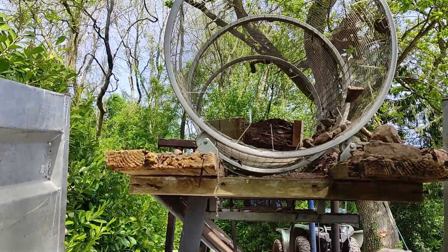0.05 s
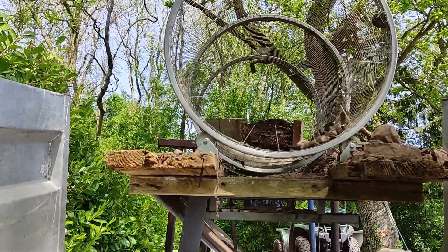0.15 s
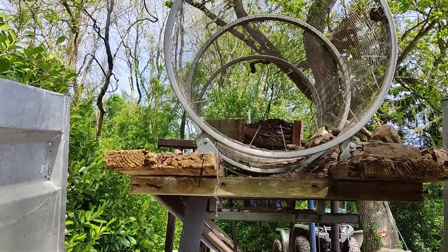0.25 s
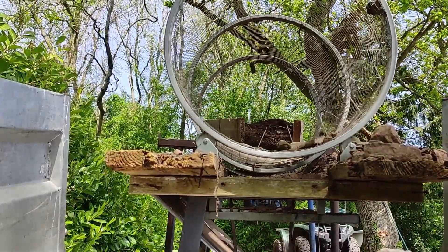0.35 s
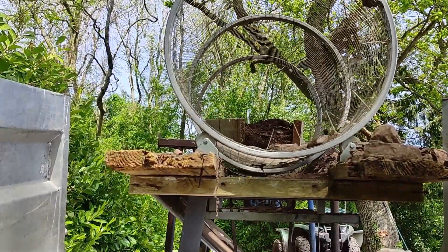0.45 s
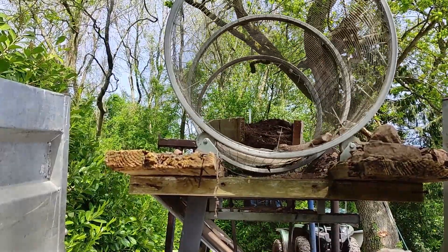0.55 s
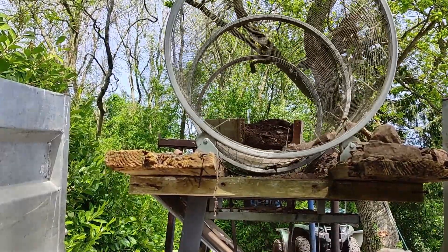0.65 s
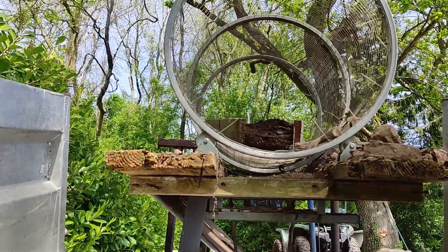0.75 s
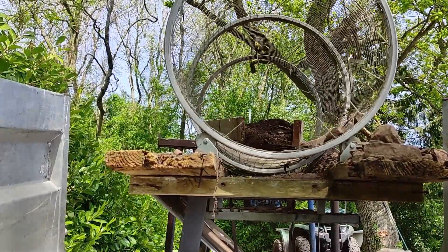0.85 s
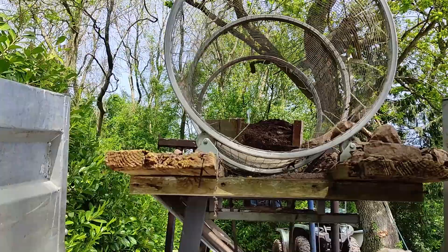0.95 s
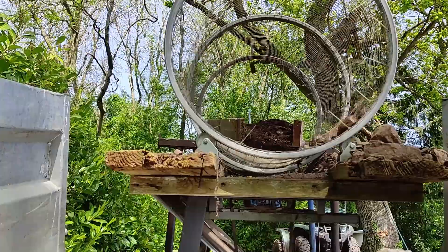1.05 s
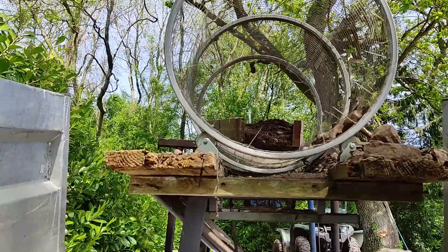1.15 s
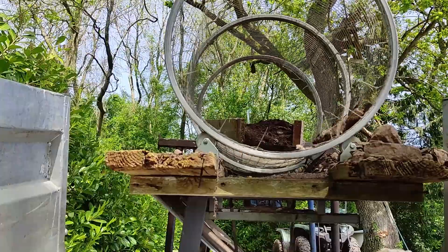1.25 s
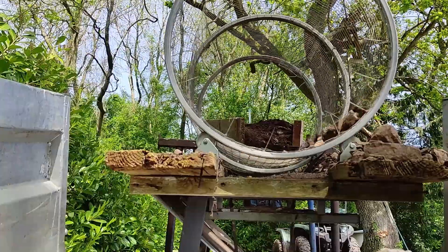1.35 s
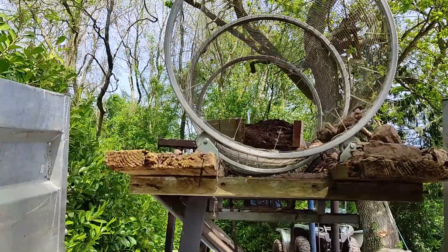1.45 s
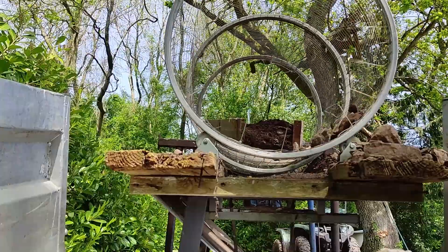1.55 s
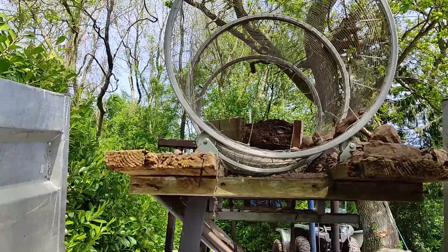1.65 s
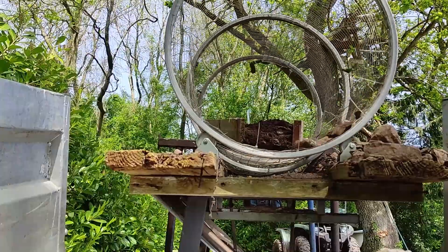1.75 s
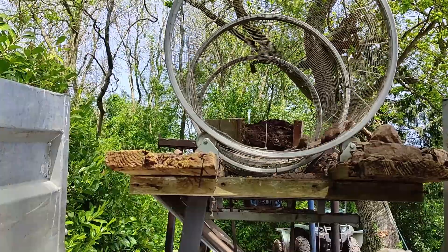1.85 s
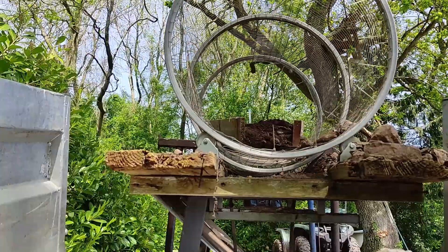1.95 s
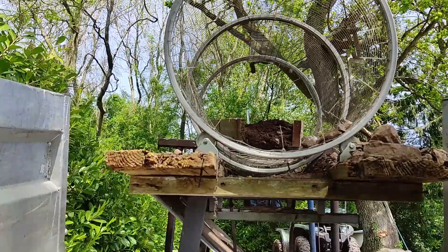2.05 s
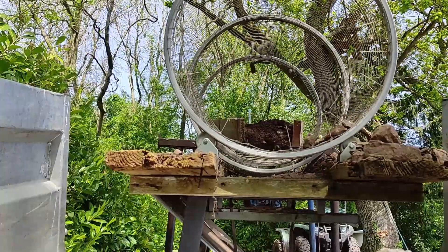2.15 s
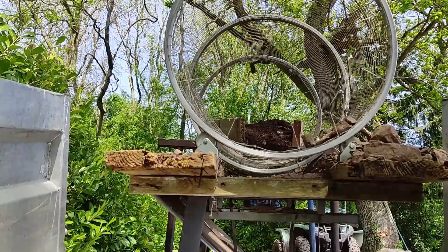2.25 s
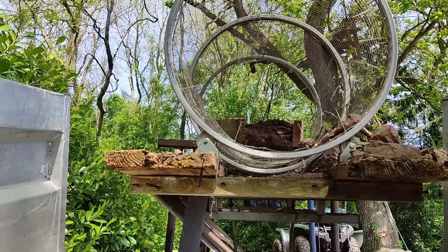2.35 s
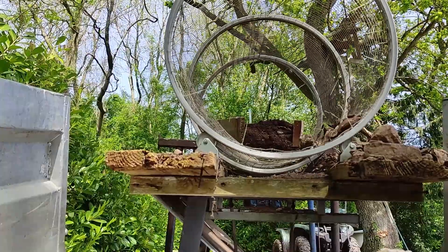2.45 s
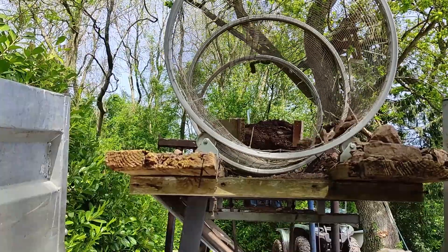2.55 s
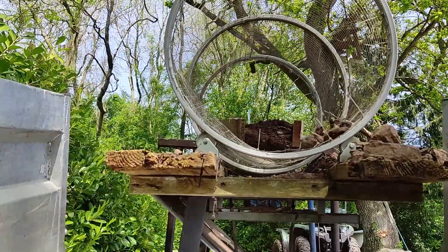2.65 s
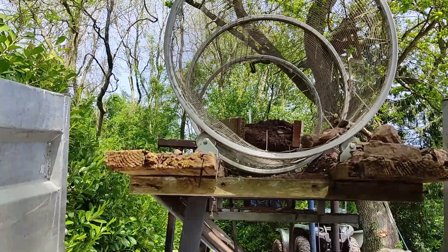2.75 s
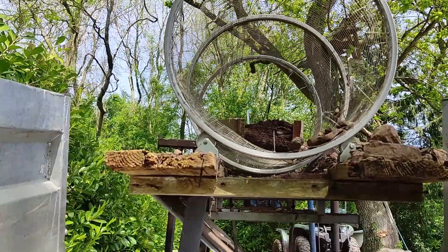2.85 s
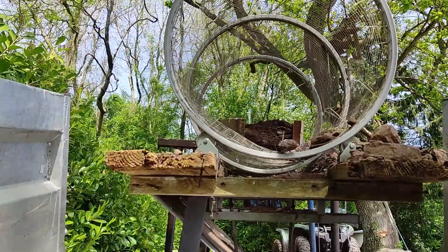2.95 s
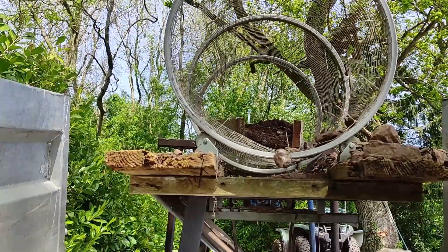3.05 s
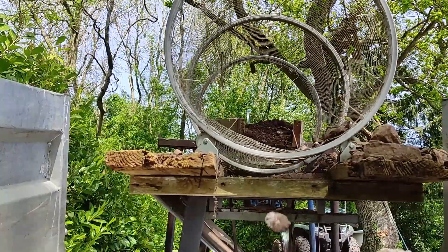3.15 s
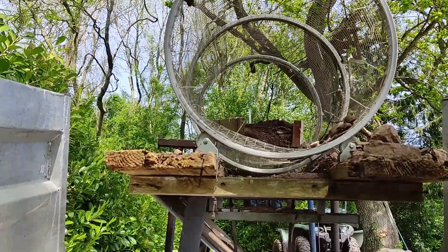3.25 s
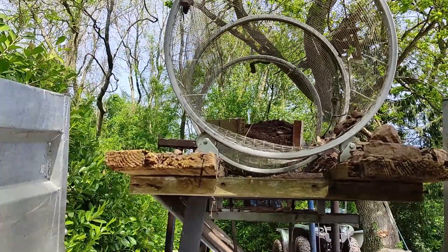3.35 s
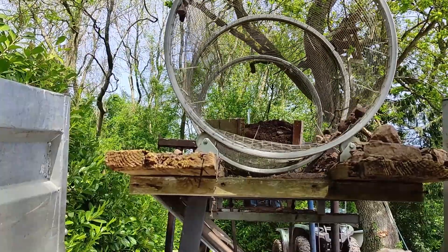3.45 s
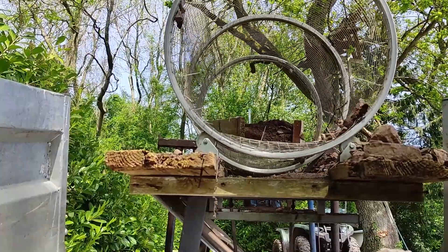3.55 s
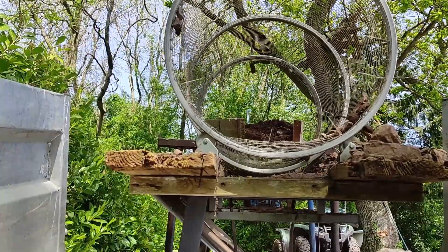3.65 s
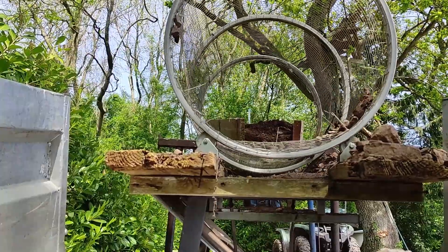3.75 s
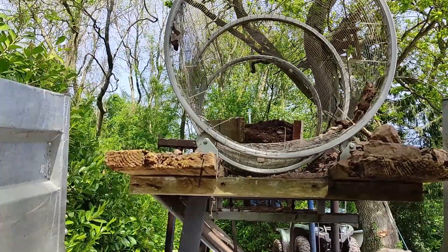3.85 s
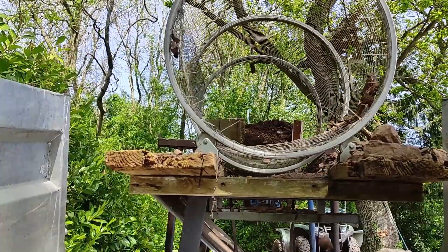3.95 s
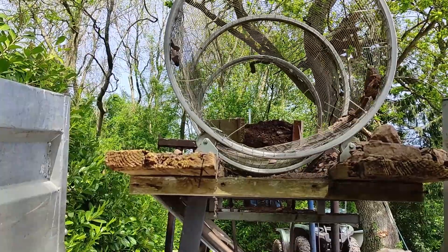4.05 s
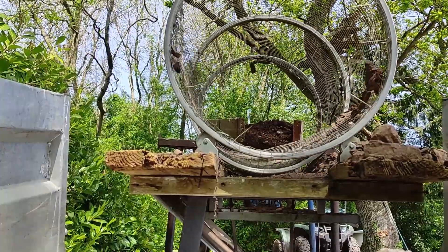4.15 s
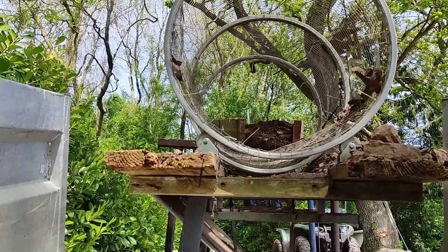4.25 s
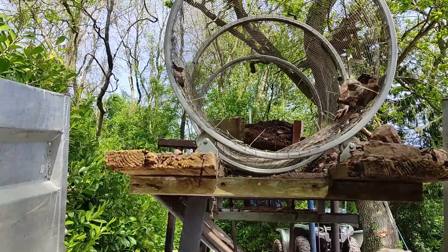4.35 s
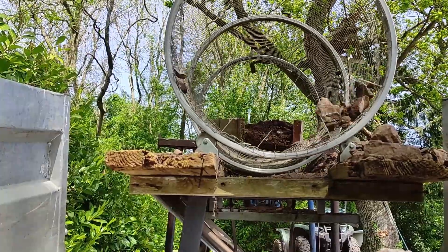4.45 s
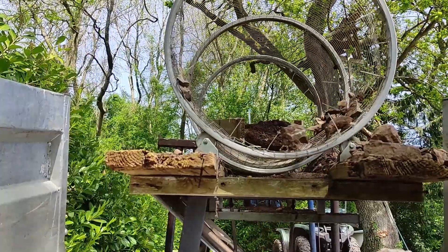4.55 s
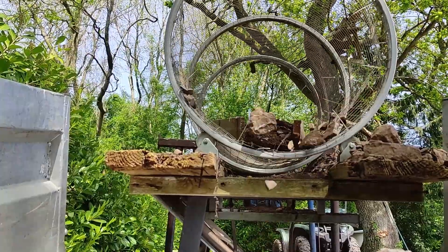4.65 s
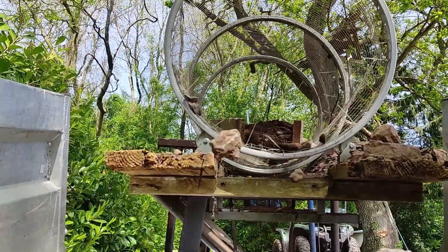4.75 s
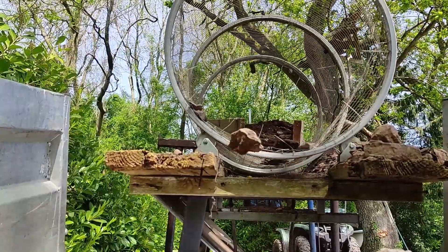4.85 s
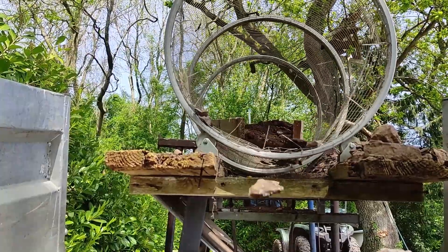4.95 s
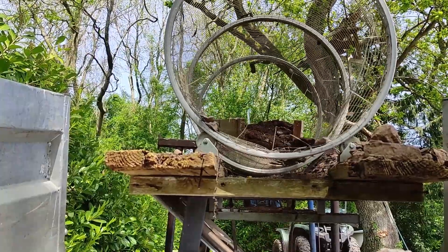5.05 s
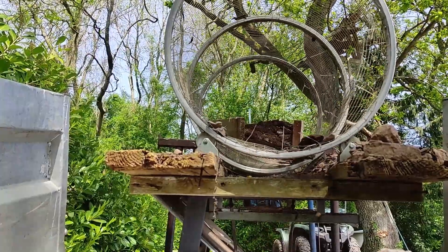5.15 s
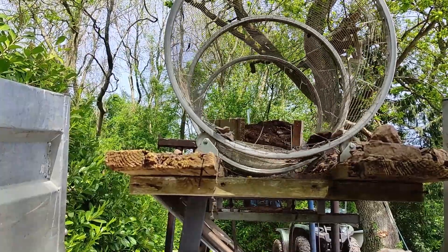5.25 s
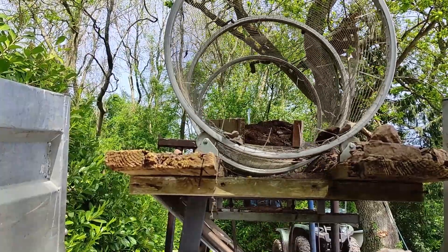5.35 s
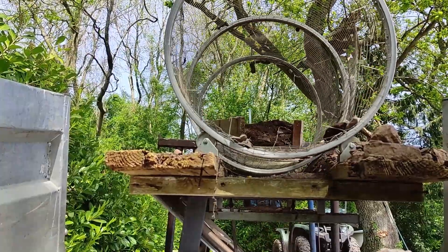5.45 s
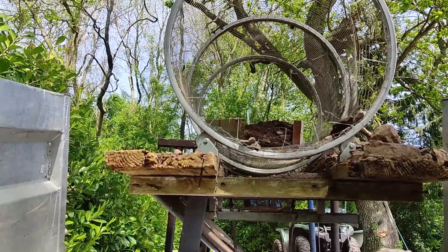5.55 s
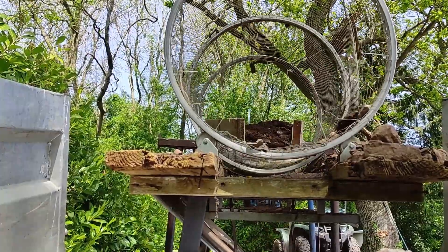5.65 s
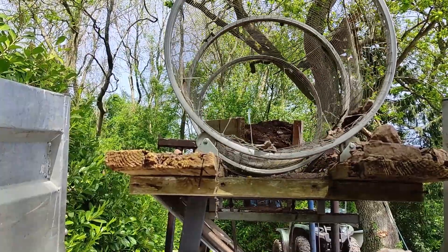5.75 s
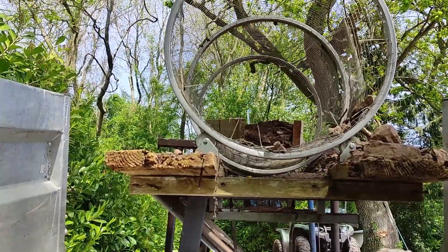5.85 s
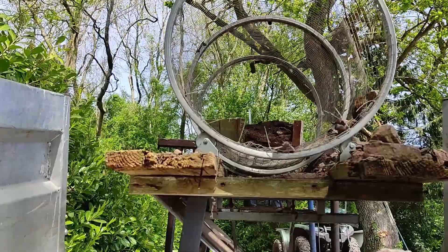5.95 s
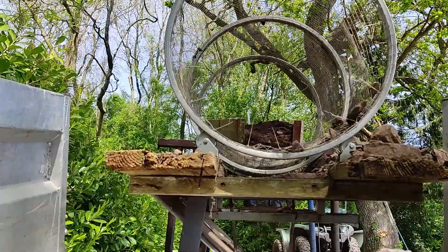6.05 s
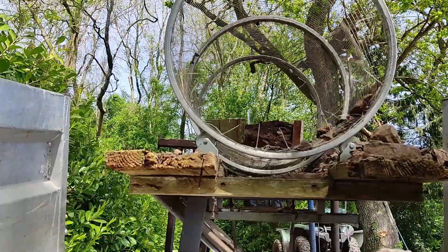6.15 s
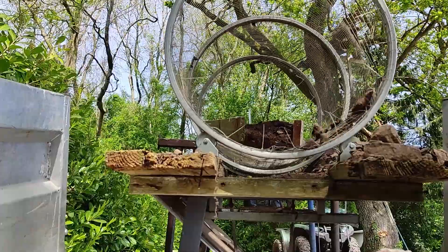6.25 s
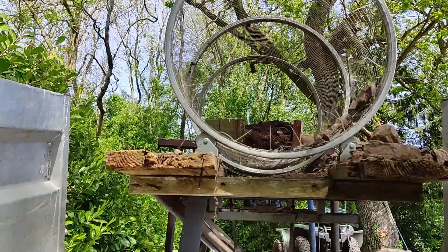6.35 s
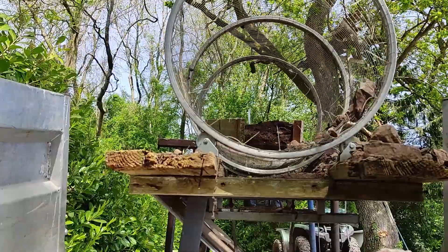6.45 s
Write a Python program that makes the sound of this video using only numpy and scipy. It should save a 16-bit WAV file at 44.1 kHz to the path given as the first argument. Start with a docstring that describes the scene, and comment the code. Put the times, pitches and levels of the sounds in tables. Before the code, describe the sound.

Dry rattling of soil and small stones on wire mesh, a periodic squeak, low rumble, and two heavy metallic bangs.

```python
"""Booms and knocks stand out over rattling wire, a hiss of soil, short squeaks and a low rumble.
Stones and clods tumble in a slowly turning wire-mesh drum outdoors and drop onto a frame and a sheet-metal bed.
Drops and clods excite decaying modes of metal and mesh through bursts of small contacts; squeaks are
stick-slip tones, the loud ones from a roller once a turn; rumble, rolling, chatter and soil are shaped noise."""
import sys
import numpy as np
from scipy import signal
from scipy.fft import rfft, irfft
from scipy.io import wavfile
from scipy.ndimage import uniform_filter1d

SR = 44100
rng = np.random.default_rng(int(sys.argv[2]) if len(sys.argv) > 2 else 0)


def wav_out(sig):
    """Save sig, one row per channel (or a flat mono array), as 16-bit PCM at SR to the path in sys.argv[1]."""
    wavfile.write(sys.argv[1], SR, np.round(np.clip(np.atleast_2d(sig).T, -1, 1) * 32767).astype(np.int16))


N = 286650
HIT_T = np.arange(int(0.3 * SR)) / SR  # time axis of one hit, s


def undb(db):
    """Logarithmic level: decibels to an amplitude ratio."""
    return 10 ** (np.asarray(db) / 20)


def unit(x):
    """Normalization: scale to a standard deviation of 1."""
    return x / x.std()


def band(x, low_hz, high_hz):
    """Band-pass filtering: gentle slopes on both sides."""
    return signal.sosfilt(signal.butter(2, [low_hz, high_hz], "band", fs=SR, output="sos"), x)


def colour(x, spectrum):
    """Spectral shaping: weight each frequency by (Hz, dB) points, then scale to rms 1."""
    hz, db = np.transpose(spectrum)
    grid = np.maximum(np.arange(len(x) // 2 + 1) * SR / len(x), 1)
    gain_db = np.interp(np.log(grid), np.log(hz), db, -120, -120)
    y = irfft(rfft(x) * undb(gain_db), len(x))
    return y / np.sqrt(np.mean(y ** 2))


def walk(rate):
    """Slow random modulation: random levels held 1 / rate s and smoothed twice."""
    hold = int(SR / rate)
    steps = np.repeat(rng.standard_normal(N // hold + 1), hold)
    return 1.02 * uniform_filter1d(uniform_filter1d(steps, hold), hold)[:N]


def slips(rate, tail_s, spread_db, depth):
    """Random pulse process: slides of the load make a gain rise at random moments and sink back; rms 1."""
    starts = (rng.random(N) < rate / SR) * undb(spread_db * rng.exponential(size=N))
    slides = signal.lfilter([1], [1, -np.exp(-1 / (tail_s * SR))], starts)
    gain = 1 + depth * uniform_filter1d(slides, size=150)
    return gain / np.sqrt(np.mean(gain ** 2))


def ring(modes, near_hz, favour_db, octaves, scatter_db):
    """Modal superposition: one tap starts decaying sines; where it lands favours those near one pitch."""
    hz, db, t60 = (c[:, None] for c in np.transpose(modes))
    level_chance, pitch_chance = rng.standard_normal((2, len(modes), 1))
    favour = np.exp(-(np.log2(hz / near_hz) / octaves) ** 2)
    db = db + favour_db * favour + scatter_db * level_chance
    sines = np.sin(2 * np.pi * hz * (1 + 0.014 * pitch_chance) * HIT_T)
    return np.sum(undb(db - 60 * HIT_T / t60) * sines, axis=0)


def strike(taps, modes):
    """Linear response: every tap of a contact burst starts the same ringing."""
    return signal.fftconvolve(taps, modes)[:len(taps)]


def crumble(length_s, rise_s, tail_s, grit_db):
    """Contact noise: many small contacts as noise that rises, holds and dies, uneven if grit_db > 0."""
    shape = np.minimum(HIT_T / rise_s, 1) * np.exp(-np.maximum(HIT_T - length_s, 0) / tail_s)
    return shape * rng.standard_normal(len(HIT_T)) * undb(grit_db * rng.exponential(size=len(HIT_T)))


def add(out, sound, s, peak_db):
    """Superposition: mix a sound in at a time and a peak level (taken over about 9 ms)."""
    peak = np.sqrt(2 * uniform_filter1d(sound ** 2, size=400).max())
    i = max(int(s * SR), 0)
    out[i:i + len(sound)] += (sound * undb(peak_db) / peak)[:N - i]


def grains():
    """Granular noise: samples of very uneven strength."""
    return rng.standard_normal(N) * undb(1.44 * rng.exponential(size=N))


# Low spectrum of the frame. Each row: frequency in Hz, relative density in dB.
RUMBLE_SPECTRUM = [(15, -43), (25, -17), (43, 8), (69, -1.5), (103, 10.5), (209, -13), (248, -9),
                   (280, -38), (360, -67.5), (620, -120)]


def frame_rumble(rumble_db):
    """Forced vibration: low noise whose level wanders slowly around the load's level."""
    return colour(grains(), RUMBLE_SPECTRUM) * undb(rumble_db + 1.2 * walk(5.3))


# Spectrum of rolling clods. Each row: frequency in Hz, relative density in dB.
ROLLING_SPECTRUM = [(140, -30.5), (230, -0.5), (287, -6.5), (412, -4.5), (602, -8), (679, -7), (802, -8),
                    (2100, -21.5), (2730, -47), (4620, -120)]
# Modes of the sheet-metal bed and frame. Each row: nominal frequency in Hz, relative level in dB,
# 60 dB decay time in s.
BED_MODES = [(55, -17, .2), (95, 16, 0.16), (114.2, 16.5, 0.15), (151.8, 6.5, 0.23), (158, 2, 0.13),
             (208.6, -20.5, 0.11), (246.4, -10, 0.25), (326, -28.5, 0.25), (413, -8.5, 0.16),
             (405, -20, 0.026), (496, -10.5, 0.13), (559, -12.5, 0.25), (673, -15.5, 0.26),
             (695, -26.5, 0.26), (887, -22.5, 0.14), (980, -18.5, 0.13), (1003, -13.5, 0.22),
             (1213, -2.5, 0.027), (1345, -17, 0.081), (1589, -21, 0.12)]


def rolling_clods(rolling_db):
    """Random excitation: uneven rolling noise, and the hum of the frame that it keeps ringing."""
    frame = ring([m for m in BED_MODES if m[0] > 200], 420, 0, 1, 0)
    push = rng.standard_normal(N) * slips(16, 0.047, 3.46, 3.5)
    hum = unit(signal.fftconvolve(push, frame)[:N])
    rolling = colour(grains() * slips(46, 0.019, 0.64, 0.88), ROLLING_SPECTRUM)
    return (rolling + undb(-9.0) * hum) * undb(rolling_db)


# Spectrum of chattering wires. Each row: frequency in Hz, relative density in dB.
CHATTER_SPECTRUM = [(1120, -32.5), (1900, -55), (2290, 10.5), (2500, 6.5), (3250, 12), (3630, 8), (4040, 4),
                    (4600, -14), (5980, -51), (10100, -120)]


def mesh_chatter(chatter_db, slide):
    """Amplitude modulation: slides of the load shake noise coloured like the wires."""
    return colour(grains() * slide * slips(30, 0.0049, 1.7, 1.0), CHATTER_SPECTRUM) * undb(chatter_db)


# Spectrum of falling soil. Each row: frequency in Hz, relative density in dB.
SOIL_SPECTRUM = [(2470, -21), (4200, -2.5), (4920, -2), (5930, -2.5), (6330, -2), (7310, 1), (7820, -8.5),
                 (8460, -53.5), (11000, -73), (18600, -120)]


def sifting_soil(soil_db, chatter_db, slide):
    """Granular flow: coarse crumbs sound lower and go with the chatter; fine sand hisses on top."""
    crumbs = band(colour(grains() * slide * slips(56, 0.01, 3.6, 1.1), SOIL_SPECTRUM), 2400, 4920)
    sand = band(colour(grains() * slide * slips(40, 0.0092, 3.0, 0.69), SOIL_SPECTRUM), 5370, 11000)
    return crumbs * undb((soil_db + chatter_db) / 2 - 2.5) + sand * undb(soil_db)


# Load in the drum. Each row: time in seconds, then the nominal levels in dB of rumble, rolling,
# mesh chatter and sifting soil.
LOAD_LEVELS = [(0, -57.5, -54.5, -55.5, -58.5), (0.15, -51.5, -63, -66.5, -65.5),
               (0.6, -54.5, -63.5, -65.5, -65), (1.1, -59, -64, -67.5, -68), (1.55, -55.5, -62, -66.5, -66),
               (2.3, -59, -64.5, -70.5, -71), (2.62, -51.5, -63, -66.5, -64.5),
               (2.72, -56.5, -68, -61.5, -59), (2.95, -50, -55.5, -56.5, -57),
               (3.2, -49.5, -65.5, -61, -61.5), (3.29, -63, -62, -67, -70.5),
               (3.55, -43.5, -59.5, -63, -55), (3.7, -52, -64, -67.5, -71),
               (4.1, -57.5, -65.5, -66.5, -67.5), (4.3, -47.5, -58.5, -64.5, -65),
               (4.45, -50, -59.5, -60, -60), (4.53, -56.5, -61, -67.5, -73), (4.72, -48.5, -60.5, -64, -53),
               (4.86, -49, -57.5, -56.5, -51), (5.1, -45, -50, -65.5, -69), (5.4, -56.5, -58, -63.5, -65),
               (5.8, -55.5, -61.5, -69.5, -71), (6.1, -57, -63.5, -65, -64), (6.5, -56, -65.5, -71, -67.5)]


def tumbling():
    """Common excitation: the turning load drives rumble, rolling, chatter and soil together."""
    s, *columns = np.transpose(LOAD_LEVELS)
    rumble_db, rolling_db, chatter_db, soil_db = (np.interp(np.arange(N) / SR, s, c) for c in columns)
    slide = slips(22, 0.015, 2, 0.45)  # shakes wires and soil together
    return (frame_rumble(rumble_db) + rolling_clods(rolling_db)
            + mesh_chatter(chatter_db, slide) + sifting_soil(soil_db, chatter_db, slide))


# Squeaks, the loud ones from a roller once a turn. Each row: start in seconds, peak level in dB,
# pitch approached in Hz, length before the trail-off in s.
SQUEAK_EVENTS = [(1.3, -36.5, 1602, 0.045), (1.94, -59.5, 1430, 0.095), (2.69, -38.5, 1594, 0.052),
                 (4.048, -37, 1607, 0.054), (4.525, -49, 5800, 0.0057), (5.378, -38, 1590, 0.04),
                 (6.034, -60, 1360, 0.1)]


def squeaks():
    """Stick-slip friction: a tone that glides up as it swells and trails off roughly."""
    out, t = np.zeros(N), np.arange(int(0.25 * SR)) / SR
    for s, peak_db, hz, length_s in SQUEAK_EVENTS:
        after = np.maximum(t - length_s, 0)
        swell = np.minimum(t / (0.68 * length_s), 1) ** 2
        trail = np.exp(-after / 0.0053) + 0.22 * np.exp(-after / 0.047)
        noise = rng.standard_normal((2, len(t)))
        pitch_rough, level_rough = uniform_filter1d(noise, size=250) * np.sqrt(250)
        glide = -0.07 * np.exp(-t / (0.38 * length_s))
        pitch_hz = hz * (1 + glide + (0.01 + 0.5 * after) * pitch_rough)
        tone = np.sin(2 * np.pi * np.cumsum(pitch_hz) / SR)
        add(out, swell * trail * tone * undb(3.1 * level_rough), s, peak_db)
    return out


# Modes of wire mesh and hoops. Each row: nominal frequency in Hz, relative level in dB,
# 60 dB decay time in s.
MESH_MODES = [(2130, -4.5, 0.08), (2400, -1.5, 0.11), (2702, 3, 0.037), (2932, 0.5, 0.051),
              (3260, 6, 0.017), (3510, 0, 0.034), (3720, 2, 0.033)]
# Clods on the mesh. Each row: time in seconds, peak level in dB, favoured pitch in Hz,
# grit peak level in dB, scrape length in s.
RATTLE_EVENTS = [(0.03, -44.5, 2480, -73, 0.027), (0.102, -53, 2750, -71, 0.025),
                 (0.32, -61.5, 3100, -69, .008), (0.421, -61, 3220, -63, .01),
                 (0.463, -54.5, 2860, -61, .016), (0.509, -46.5, 2990, -51, 0.037),
                 (0.579, -52, 3240, -55.5, 0.0064), (0.6252, -50.5, 2940, -63, 0.028),
                 (0.7202, -51, 2240, -52, 0.011), (0.838, -61, 2900, -74, 0.01),
                 (0.878, -54.5, 2900, -75, 0.032), (0.977, -54.5, 3040, -74, 0.014),
                 (1.0497, -63, 2940, -62.5, 0.02), (1.372, -48.5, 3280, -59, .012),
                 (1.3905, -46, 3080, -75, 0.01), (1.443, -45.5, 2380, -56, 0.0057),
                 (1.6126, -51, 2270, -72, 0.041), (1.6433, -45, 2400, -84, 0.011),
                 (1.7117, -52.5, 2450, -64, 0.027), (2.4037, -53, 3850, -61, 0.0071),
                 (2.479, -54, 3270, -54, 0.015), (2.5079, -35, 3500, -42, 0.013),
                 (2.7136, -46.5, 3180, -54, 0.054), (2.8071, -45.5, 3380, -51.5, 0.026),
                 (2.8594, -42, 3400, -53, 0.006), (2.878, -42.5, 3270, -48, .022),
                 (2.9224, -39.5, 3520, -47, 0.017), (3.0171, -48, 2060, -54.5, 0.042),
                 (3.052, -49, 3530, -55, 0.084), (3.1442, -46, 3200, -52, 0.0074),
                 (3.197, -46, 3200, -59, 0.014), (3.3433, -41.5, 3350, -40, 0.031),
                 (3.48, -55, 3500, -65, 0.028), (3.6237, -55.5, 3440, -58, 0.016),
                 (3.707, -48, 2740, -69, 0.013), (3.832, -51.5, 2300, -62.5, 0.043),
                 (4.127, -48.5, 3160, -65, 0.0074), (4.2024, -46, 3640, -54, 0.03),
                 (4.215, -44.5, 3100, -51, 0.014), (4.375, -49, 3100, -58, 0.016),
                 (4.446, -54, 3120, -64, 0.0069), (4.7506, -75, 3220, -45, 0.0049),
                 (4.806, -54, 3230, -48, 0.029), (4.8875, -48, 2050, -50.5, 0.026),
                 (5.1163, -51, 1950, -67.5, 0.073), (5.1758, -38.5, 2800, -37.5, 0.029),
                 (5.1944, -39, 2920, -29.5, 0.019), (5.3744, -44, 3390, -46.5, 0.034),
                 (5.5314, -52, 2390, -56.5, 0.016), (5.6644, -49, 2480, -61, 0.014),
                 (5.732, -56, 2330, -59.5, 0.012), (5.8345, -51, 2340, -77, 0.0062),
                 (6.175, -54, 2450, -77, 0.0054), (6.124, -48, 3380, -45, 0.012)]


def rattles():
    """Impulsive modal excitation: a clod scrapes over wires that ring briefly, and grit sprays off."""
    out = np.zeros(N)
    for s, peak_db, hz, grit_db, scrape_s in RATTLE_EVENTS:
        taps = crumble(scrape_s, 0.0015, 0.014, 2.8)
        taps = taps * (1 + 0.84 * np.exp(-HIT_T / 0.002))  # the first touch is the hardest
        wires = unit(strike(taps, ring(MESH_MODES, hz, 9, 0.15, 3)))
        scrape = unit(band(taps, hz / 1.099, hz * 1.065))
        rattle = wires + undb(-4.5) * scrape + undb(-6.0) * colour(taps, CHATTER_SPECTRUM)
        add(out, rattle, s - 0.002, peak_db)
        grit = colour(crumble(scrape_s, 0.0015, 0.015, 3.07), SOIL_SPECTRUM)
        add(out, grit, s - 0.002, grit_db)
    return out


def boom(low_modes, hz, contact_s):
    """Low-mode excitation: a soft push swings the lowest modes of the bed."""
    push = band(crumble(contact_s, 0.0046, 0.0039, 0), 68, 320)
    swing = unit(strike(push, ring(low_modes, hz, 6.4, 0.39, 0.8)))
    # the sheet jolts before it settles into its lowest modes
    thump = unit(band(band(push, 125, 167), 125, 167))
    return swing + undb(-11.5) * thump


def knock(middle_modes, hz, contact_s):
    """Impact: the stone excites the middle modes and sounds dull and short around its own pitch."""
    taps = crumble(0.41 * contact_s, 0.00086, 0.013, 3.23)
    metal = unit(strike(taps, ring(middle_modes, hz, 11.0, 0.15, 4.2)))
    stone = unit(band(taps, hz / 1.207, hz * 1.107))
    return metal + undb(0.5) * stone


def clack(high_modes, contact_s):
    """Multiple impacts: crumbs of the stone clack on the upper modes."""
    taps = crumble(0.45 * contact_s, 0.0043, 0.022, 3.87)
    metal = unit(strike(taps, ring(high_modes, 1000, 0, 1, 3)))
    crumbs = unit(band(taps, 720, 1720))
    return metal + undb(1.0) * crumbs


# Drops onto the bed. Each row: time in seconds, knock peak level in dB, knock pitch in Hz,
# clack peak level in dB, boom peak level in dB, favoured boom pitch in Hz.
DROP_EVENTS = [(0.031, -48, 367, -57, -59, 82.5), (0.213, -59, 358, -73, -43, 100),
               (0.506, -51.5, 704, -45.5, -57, 107), (0.806, -47, 488, -60, -58, 125),
               (1.357, -53, 656, -55.5, -61, 95), (1.641, -54.5, 272, -52.5, -52, 123),
               (2.047, -63, 517, -58, -53, 94), (2.514, -50, 650, -50, -54, 72.7),
               (2.802, -55, 600, -61, -45, 110), (2.86, -52, 500, -60, -57, 101),
               (2.945, -54.5, 564, -78, -40, 121), (3.018, -51, 530, -51, -57, 120),
               (3.047, -52.5, 507, -48, -56, 110), (3.344, -37.5, 283, -34, -16.5, 118),
               (3.36, -30.5, 438, -34, -32, 95), (3.398, -37, 420, -43, -27, 97.6),
               (3.573, -41.5, 383, -57.5, -38.5, 94), (3.619, -40, 350, -51.5, -44, 109),
               (3.66, -51.5, 600, -69, -66, 100), (4.132, -47, 332, -53.5, -50, 99.6),
               (4.159, -41.5, 416, -56, -42, 112), (4.211, -33.5, 430, -38.5, -44, 94.2),
               (4.24, -42.5, 287, -57, -55, 90), (4.33, -50, 400, -57, -44, 95),
               (4.42, -49.5, 412, -58.5, -62, 101), (4.441, -57, 480, -67, -36, 121),
               (4.48, -52, 440, -63.5, -62, 95), (4.726, -79, 360, -65.5, -36.5, 73.4),
               (4.766, -72, 354, -70, -36.5, 95), (4.887, -27.5, 434, -39, -24, 72),
               (4.904, -38, 400, -43.5, -21, 92), (5.001, -33, 286, -43, -27.5, 101),
               (5.022, -40, 593, -43.5, -35.5, 95), (5.113, -34, 428, -38.5, -59, 72.3),
               (5.177, -16.5, 385, -28, -12.5, 85), (5.193, -20.5, 414, -24.5, -14, 102),
               (5.244, -34, 578, -37, -23, 98), (5.32, -47, 556, -73, -38.5, 83),
               (5.376, -48, 540, -45.5, -54, 99.6), (5.526, -47.5, 475, -64, -63, 101.8),
               (5.68, -46.5, 428, -59, -70.5, 97), (6.024, -48.5, 608, -58.5, -53, 88)]


def drops():
    """Modal division of an impact: boom, knock and clack share the low, middle and high bed modes."""
    out = np.zeros(N)
    contact_s, boom_top_hz, knock_top_hz = 0.0303, 270, 780
    edges = (0, boom_top_hz, knock_top_hz, SR)
    low, middle, high = ([m for m in BED_MODES if a < m[0] <= b] for a, b in zip(edges, edges[1:]))
    for s, knock_db, knock_hz, clack_db, boom_db, boom_hz in DROP_EVENTS:
        add(out, boom(low, boom_hz, contact_s), s - 0.004, boom_db)
        add(out, knock(middle, knock_hz, contact_s), s - 0.002, knock_db)
        add(out, clack(high, contact_s), s - 0.002, clack_db)
    return out


def scene():
    """Superposition: background and impacts add linearly in one channel."""
    return (tumbling() + squeaks() + rattles() + drops())[None]


def record(dry):
    """Saturation and band limiting: loud peaks are rounded, the top cut steeply, faint electronic hiss added."""
    top_hz, ceiling = 8450, 0.45
    rounded = ceiling * np.tanh(dry / ceiling)
    cut = signal.sosfilt(signal.ellip(12, 0.2, 90, top_hz, fs=SR, output="sos"), rounded)
    return cut + undb(-103) * rng.standard_normal(dry.shape)


dry = scene()
out = record(dry)
wav_out(out)
```